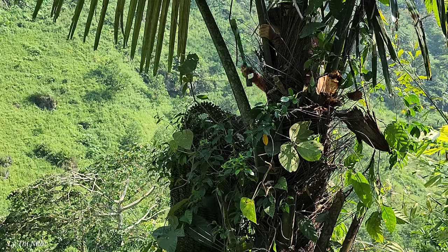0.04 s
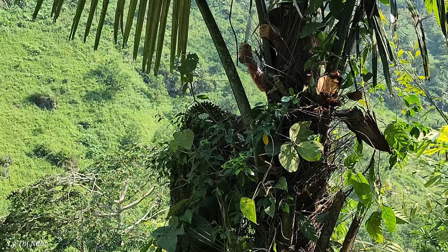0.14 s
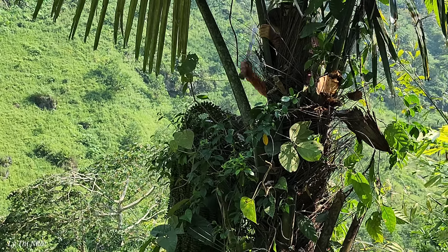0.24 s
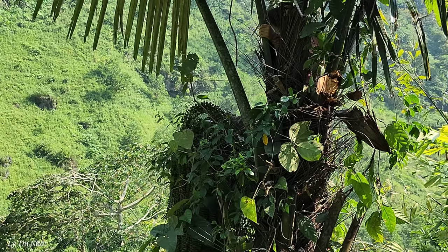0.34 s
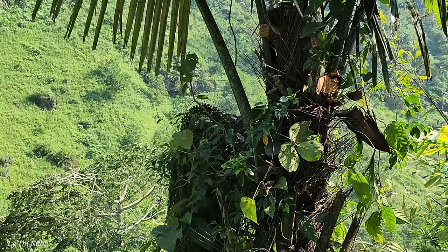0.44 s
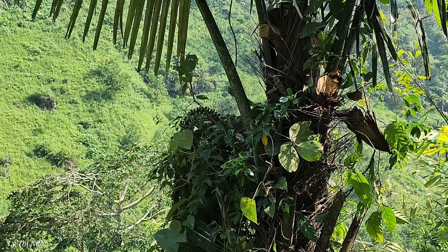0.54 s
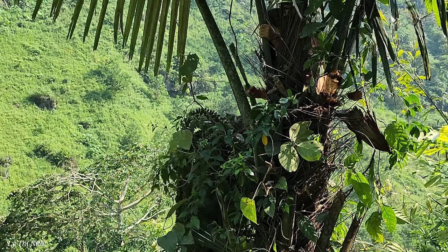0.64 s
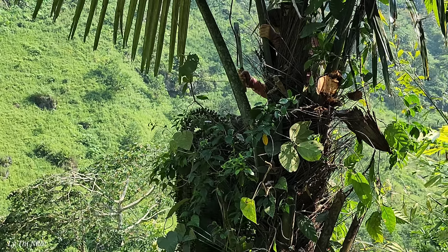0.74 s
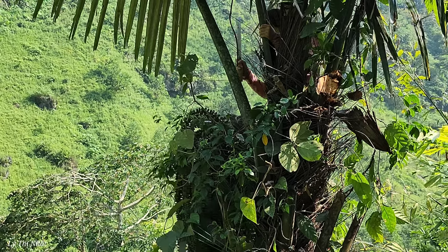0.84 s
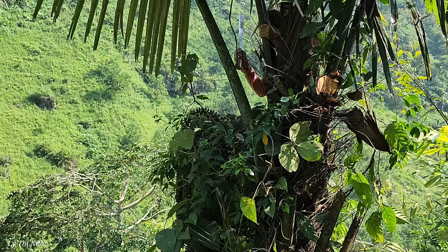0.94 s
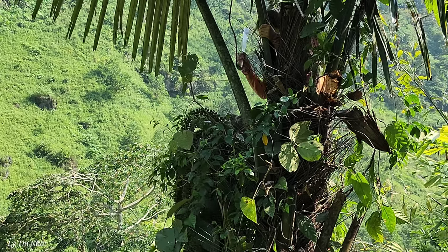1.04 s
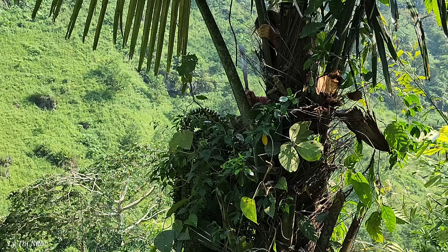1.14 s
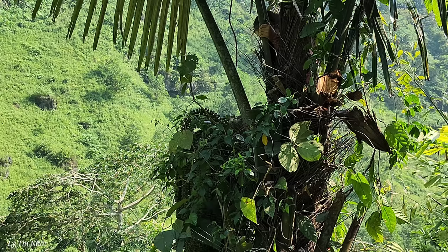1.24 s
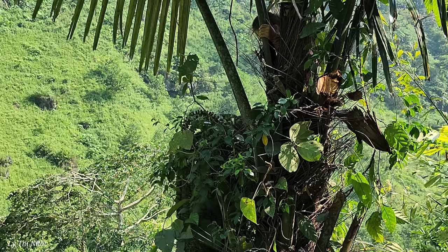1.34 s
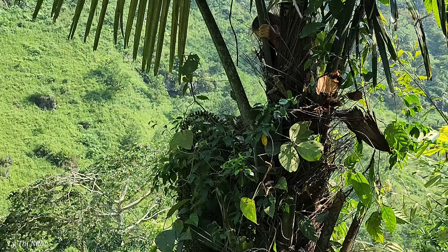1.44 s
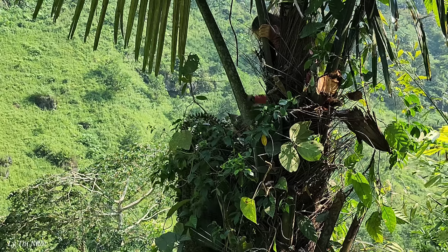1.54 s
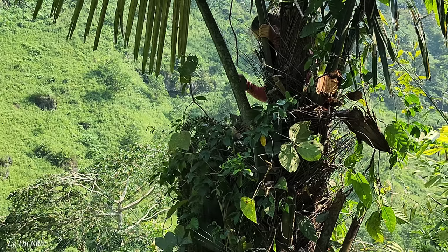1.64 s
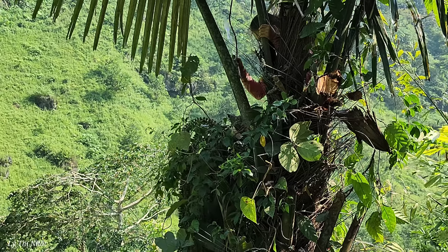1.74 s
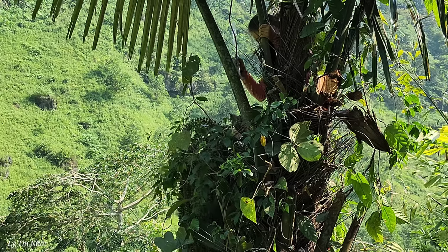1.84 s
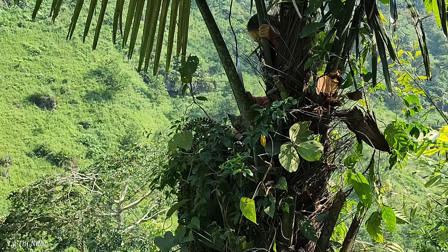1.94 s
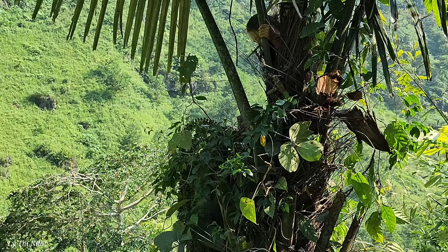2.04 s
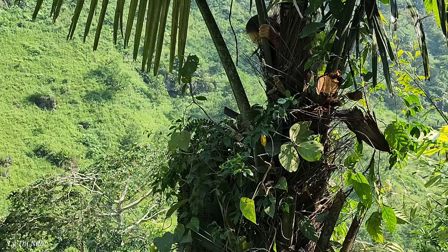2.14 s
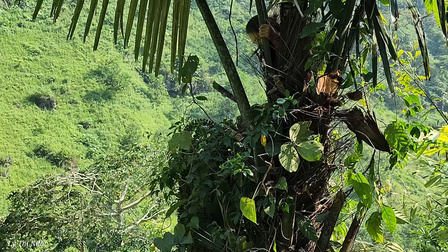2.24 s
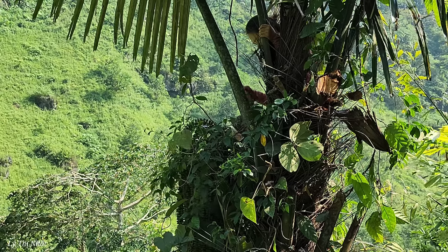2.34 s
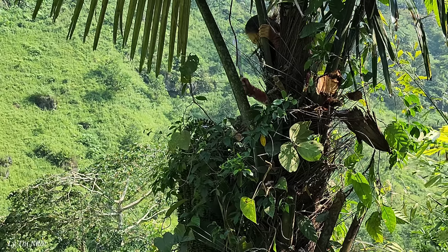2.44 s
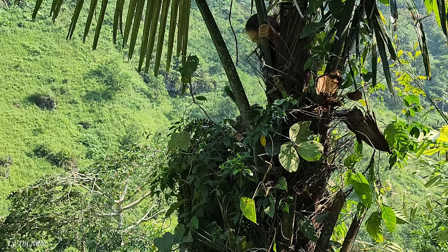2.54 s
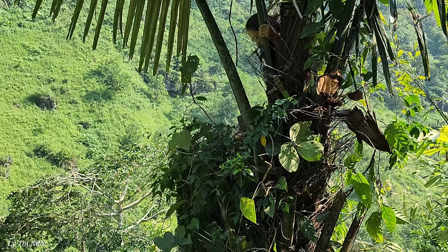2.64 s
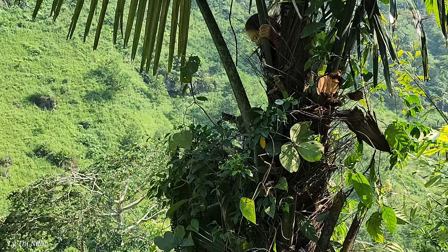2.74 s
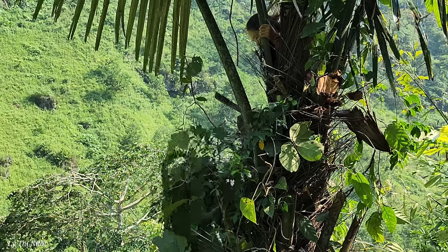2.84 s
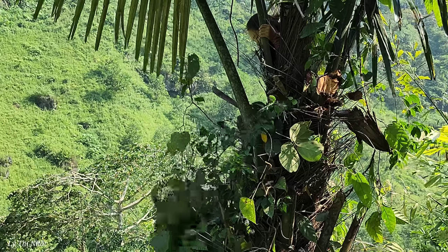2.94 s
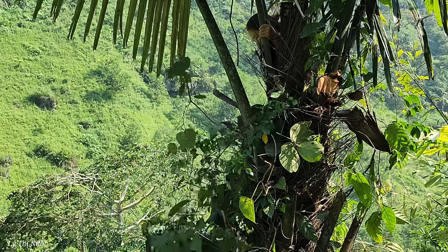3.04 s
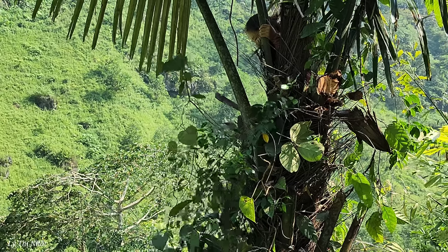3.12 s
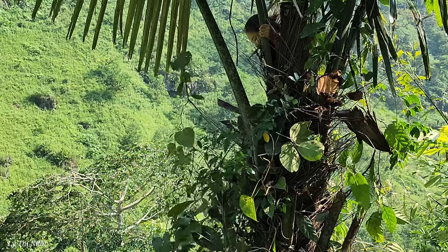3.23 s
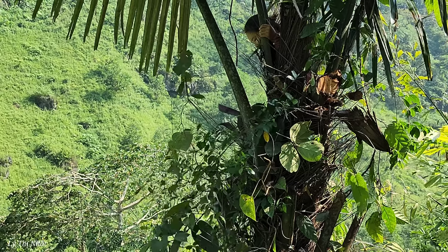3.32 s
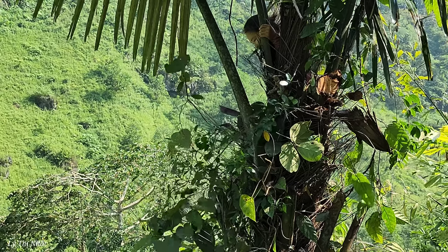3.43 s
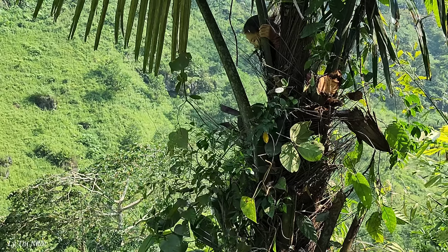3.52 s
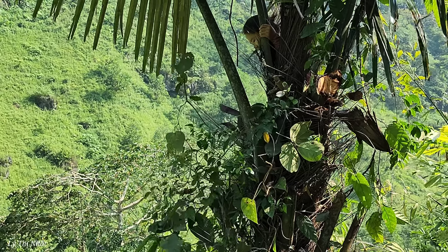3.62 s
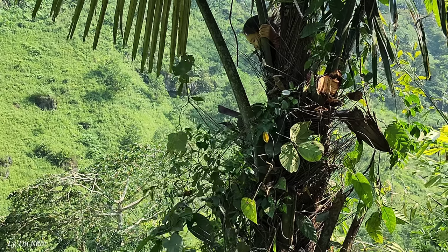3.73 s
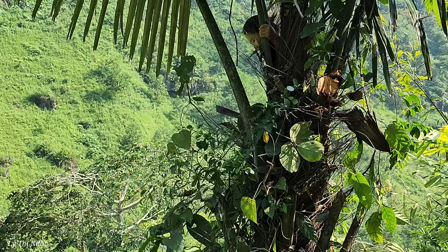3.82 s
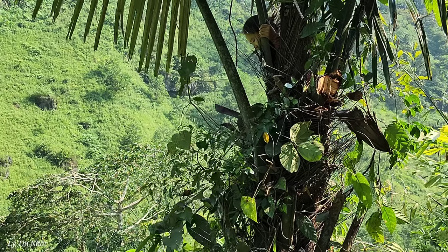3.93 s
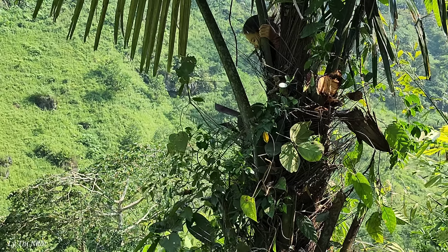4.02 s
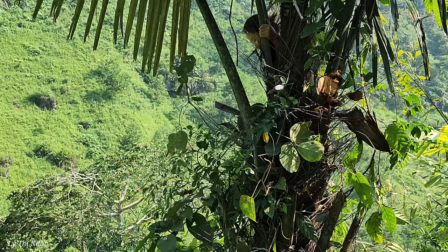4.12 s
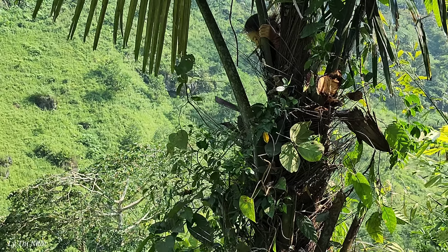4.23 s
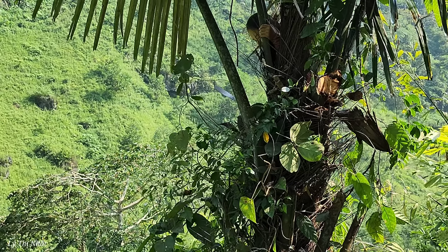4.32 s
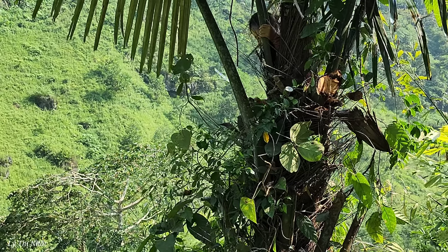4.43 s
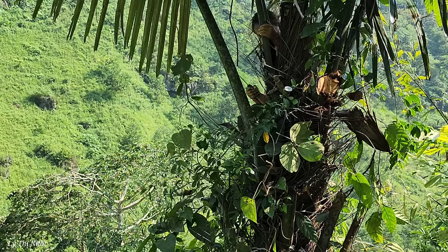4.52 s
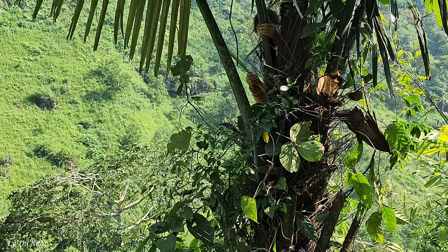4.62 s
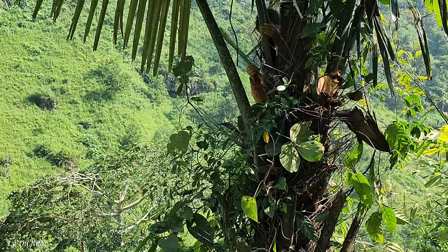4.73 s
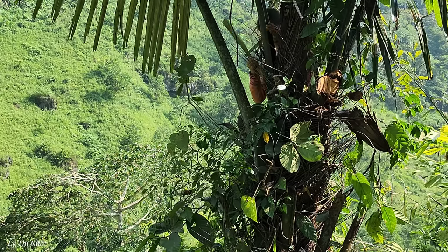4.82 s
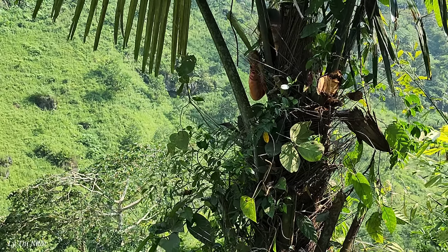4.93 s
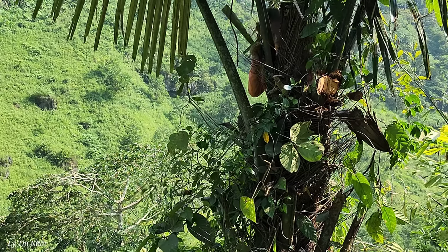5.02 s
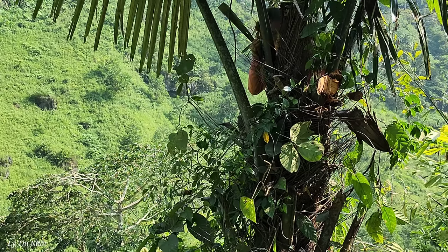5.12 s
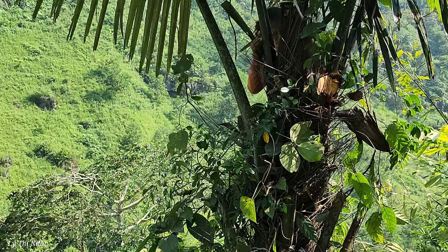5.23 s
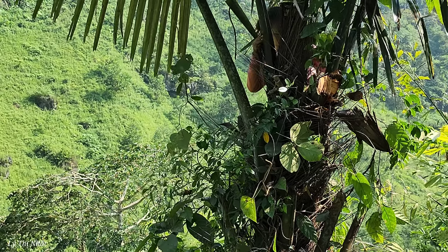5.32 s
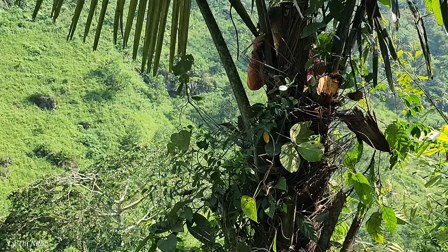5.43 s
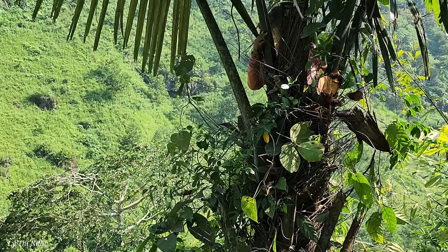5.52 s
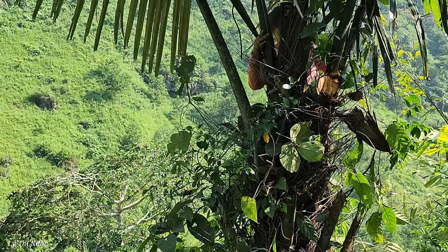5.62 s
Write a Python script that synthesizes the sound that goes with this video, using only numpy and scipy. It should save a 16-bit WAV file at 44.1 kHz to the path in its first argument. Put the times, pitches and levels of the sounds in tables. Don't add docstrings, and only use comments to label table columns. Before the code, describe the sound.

Four blade chops crack a fibrous palm stalk, then the cut bunch crashes through leaves and knocks to the ground amid cicadas and birdsong.

```python
import sys
import numpy as np
from scipy import signal
from scipy.fft import rfft, irfft, next_fast_len
from scipy.io import wavfile

SR = 44100
rng = np.random.default_rng(int(sys.argv[2]) if len(sys.argv) > 2 else 0)


def volts_from_decibels(level):
    exponent = np.asarray(level, float) / 20
    return 10 ** exponent


def transcribe(signal):
    frames = np.atleast_2d(signal).T
    limited = np.clip(frames, -1, 1)
    pcm = np.round(limited * 32767).astype(np.int16)
    wavfile.write(sys.argv[1], SR, pcm)


N = 250047

# frequency [Hz], density [dB per Hz].
AIR_SPECTRUM = [(15, -43), (25, -15), (102, -16), (189, -24.5), (307, -18.5), (500, -26.5), (1470, -22.5),
                (2890, -19), (3130, -12), (5520, -13), (6490, -34.5), (7830, 9.5), (11400, -30.5),
                (14600, -11.5), (15800, -7)]
# time [s], level [dB].
LOW_HUSH_DB = [(0, -48.5), (.17, -62), (.94, -54), (1.28, -60.5), (2.08, -55.5), (2.5, -62), (4.9, -58),
               (5.3, -54.5), (5.67, -56.5)]
SWARM_DB, SWARM_SCARED_DB = -59.5, -62

# pulses per second [1/s], pulse depth [0-1], pitch wander [Hz], level [dB].
CICADA_PULSES = [
    (141.5, 0.1, 14, -1),
    (130, 0.6, 15, -8.5),
    (122, 0.24, 13.6, -6),
]
CICADA_PITCH_HZ = (7669, 8041, 8294)
# time [s], level [dB].
CHORUS_DB = [(0.0, -52.5), (0.41, -54.5), (0.69, -53), (1.83, -51.5), (2.41, -56), (2.62, -54)]
# time [s], level [dB].
FAR_CICADA_DB = [(0, -61.5), (4.5, -59), (5.67, -58.5)]
FAR_TONES_HZ = (7520, 7990)
FAR_PULSES_PER_S = 113
KATYDID_S, KATYDID_PER_S, KATYDID_SLOWS = .2094, 23.38, .19

# start [s], length [s], level [dB].
CRICKET_TRILLS = [(0, 0.018, -68.5), (0.096, .07, -81), (0.742, 0.07, -69), (0.882, 0.086, -73.5),
                  (1.01, 0.088, -77), (1.155, 0.11, -76), (1.432, 0.1, -71), (1.577, 0.082, -68.5),
                  (2.363, 0.12, -72.5), (2.53, 0.06, -73)]
CRICKET_HZ, CRICKET_CLICKS_PER_S = 5480, 250

# length [s], start [Hz], middle [Hz], end [Hz]. CALL is the repeated one.
CALL = (.053, 2930, 3450, 2950)
ARCH = (.09, 3700, 4430, 3650)
HELD = (.28, 4300, 4310, 4300)
LOW = (.06, 1700, 1750, 1700)
RISE = (.04, 3500, 4300, 4900)
DROP = (.075, 5800, 4300, 3300)
PIP = (.015, 4500, 4100, 3700)
CALL_FIRST_S, CALL_EVERY_S, CALL_LAST_S, CALL_DB = -.008, .3237, 5.6, -62
# start [s], note (as above), level [dB].
SONG = [
    (.16, ARCH, -75),
    (.82, PIP, -74),
    (.886, ARCH, -65),
    (2.4, RISE, -70),
    (2.485, DROP, -71),
    (4.74, HELD, -74),
    (5.385, LOW, -70),
]
NOTE_SWELL = .6

# frequency [Hz], side minus mid [dB].
SIDE_MINUS_MID = [(60, -19), (150, -22), (380, -11), (950, -5.5), (2380, -5.5), (5980, 0.5), (15000, -1.5)]
# frequency [Hz], left minus right [dB].
LEFT_MINUS_RIGHT = [(60, 3.5), (110, -2), (200, 0), (380, 1.5), (700, -3), (1290, 1), (2380, -1),
                    (4400, -1.0), (8120, -3.5), (15000, -1.5)]

# frequency [Hz], density [dB per Hz].
RUSTLE_SPECTRUM = [(18, -32), (30, -21.5), (95, -2.5), (174, -8), (382, -5), (483, -9.5), (1210, -5.5),
                   (1450, 2), (1840, -20), (2040, -3), (2660, -4.5), (5540, -10), (8870, -14.5),
                   (14600, -14), (15800, -11)]
LAYER_CENTRES_HZ = (130, 520, 1900, 8000)
# time [s], lag of the right port [samples].
RIGHT_LAG_SAMPLES = [(0, -0.5), (3, 2), (3.7, 1), (4.6, 8), (5.0, 4.5), (5.67, 0)]
DRY_FROND_HZ, DRY_FROND_T60_S, DRY_FROND_DB = 5500, 0.035, -20.5
# start [s], rustle level [dB], solidity of the trunk [dB].
CROWN_JOLTS = [
    (.44, -40, 7),
    (1.331, -43.5, 5),
    (2.132, -37, -9),
    (2.67, -30, -24),
]
LAYER_JOLT_T60_S = (0.3, 0.16, 0.21, 0.13)
JOLT_STEMS_DB, JOLT_HISS_DB = 0.5, 7.5
# start [s], length [s], rustle level [dB].
DEBRIS_SHOWERS = [
    (0.435, 0.016, -39),
    (0.534, 0.2, -47.5),
    (.8, 0.067, -62),
    (1.397, 0.4, -51.5),
    (1.91, 0.026, -59),
    (2.138, .11, -52.5),
    (4.14, 0.021, -54),
    (4.267, 0.019, -42),
]
SHOWER_RISE_S, SHOWER_T60_S = 0.08, 0.19
SHOWER_LAYERS_DB = (-15, -5, -0.5, 3.5)
# time [s], rustle level [dB].
CROWN_FALL = [(2.69, -40), (2.77, -42.5), (2.916, -41.5), (3.012, -35), (3.25, -33.5), (3.298, -29.5),
              (3.465, -30), (3.48, -34), (3.68, -33)]
# time [s], rustle level [dB].
GROUND_FALL = [(3.718, -36.5), (3.76, -28.5), (3.931, -26.5), (4.03, -38), (4.585, -41), (4.63, -49),
               (4.78, -53), (5.1, -60), (5.45, -63.5)]
# still near, far below, a point past the end to drift towards [s].
FALL_MOMENTS_S = (3.11, 4.02, 7.9)
FALL_LAYERS_DB = [(-12.5, -8.5, -13), (-2, -12, -15), (-2.5, -3, 5), (5, -1.5, 5)]

# frequency [Hz], level [dB], t60 [s].
BUNCH_MODES = [(1010, -6, .018), (1430, -3, .013), (1700, -6, .012), (2060, 0, .015), (3160, -6, .009),
               (5580, -7, .01), (6240, -8, .01)]
BUNCH_HITS_PER_S, BUNCH_UNEVEN_DB = 700, 2.2
BUNCH_DB, BUNCH_DULLS_DB_PER_OCTAVE = -8, -6

# start [s], peak [dB], centre [Hz], wood knock [dB].
BLOW_SNAPS = [(0.591, -26.5, 2633, -62), (0.6007, -25.5, 3100, -36), (0.6554, -40, 3430, -47),
              (0.6845, -27.5, 5300, -70), (1.4152, -32, 6790, -58), (1.4332, -33.5, 3020, -45),
              (1.479, -26, 1070, -63), (1.5772, -32, 5480, -74), (1.6485, -34, 1970, -39),
              (1.6877, -40, 3150, -59), (1.77, -28.5, 5370, -73), (1.8318, -31, 1630, -38.5),
              (2.174, -35.5, 1970, -44)]
BUNCH_SNAPS = [(2.81, -31, 1550, -31), (2.844, -24.5, 1580, -37), (2.895, -22, 6600, -57),
               (2.9488, -24.5, 2065, -52), (2.9991, -25.5, 1320, -26.5), (3.0475, -17.5, 5400, -29),
               (3.1352, -40, 1460, -46), (3.3, -17, 1920, -54.5), (3.321, -13.5, 2470, -43),
               (3.6015, -22, 1950, -48), (3.6379, -21.5, 2030, -39), (3.666, -20, 1215, -33),
               (3.751, -21, 1450, -54), (3.784, -13.5, 1370, -48), (3.8393, -30, 794, -34),
               (3.924, -14.5, 1564, -39), (3.965, -22, 1490, -54), (4.084, -21, 1585, -44),
               (4.387, -27.5, 1320, -38), (4.4484, -29, 2140, -37), (4.4867, -28.5, 1600, -33.5),
               (4.55, -29, 6200, -80), (5.0051, -33.5, 3500, -61), (5.2973, -42, 4730, -58)]
SNAP_T60_S, SNAP_LONGER = 0.056, 0.1
# start [s], peak [dB], centre [Hz], t60 [s], wood knock [dB].
BRITTLE_TICKS = [(1.457, -22.5, 11900, 0.015, -62), (1.7699, -26, 1910, 0.029, -72),
                 (1.832, -29, 5600, 0.1, -66), (2.845, -23, 6200, 0.054, -62), (1.97, -35, 6840, 0.04, -78),
                 (3.71, -19, 11000, 0.034, -58)]
# start [s], peak [dB], centre [Hz].
LEAF_CHIPS = [(0.057, -43, 1500), (0.555, -44, 1430), (0.685, -32.5, 1670), (0.713, -53, 1410),
              (0.741, -33.5, 1540), (0.819, -48, 1940), (0.856, -42, 1280), (0.943, -42, 2550),
              (0.993, -45.5, 2240), (1.06, -42.5, 1750), (1.144, -42.5, 2820), (1.509, -33.5, 656),
              (2.043, -49, 1710), (2.26, -40, 850), (2.383, -52, 1590), (2.399, -48, 2040),
              (4.727, -37, 1134), (4.901, -47, 1750), (5.24, -42.5, 1310), (5.564, -42.5, 2020)]
LEAF_BRUSH = [
    (0.4074, -34.5, 2150),
]
CHIP_T60_S = .036
CHIP_KNOCK_DB, CHIP_KNOCK_DB_PER_OCTAVE = -19.5, -8.5
# start [s], peak [dB], centre [Hz].
RIB_HITS = [(1.439, -40, 2900), (1.456, -31, 5500), (1.471, -29.5, 2700), (1.642, -30.5, 2080),
            (1.706, -36, 3150), (1.752, -46, 3500), (1.826, -34, 2090), (1.932, -39.5, 3970),
            (.58, -44, 2770), (.608, -44, 1670), (.668, -35, 3160), (2.776, -34, 1400), (2.989, -24, 1340),
            (3.036, -28, 5540), (3.062, -21, 5660), (3.084, -24, 3120), (3.123, -21, 5630),
            (3.141, -26, 1870), (3.192, -20, 2910), (3.22, -20, 2040), (3.267, -24, 1530),
            (3.284, -14, 2000), (3.37, -45, 5500), (3.377, -20, 1520), (3.41, -17, 2000),
            (3.424, -18.5, 3400), (3.445, -30, 2080), (3.742, -17, 1350), (3.827, -24, 2270),
            (4.025, -26.5, 1330), (4.129, -34, 1440), (4.175, -31, 1590), (4.207, -40, 1490),
            (4.268, -27.5, 920), (4.289, -30, 1580), (4.398, -29, 2170), (4.585, -36, 1500)]
RIB_T60_S = 0.039

# frequency [Hz], level [dB], t60 [s].
STALK_MODES = [(203.8, -1.5, 0.042), (325.7, 0.5, 0.057), (389.6, -3, 0.051), (593, 3.5, 0.028),
               (906, -7.5, 0.058), (1200, -17, 0.077), (1499, -7, 0.031)]
# start [s], peak [dB], centre [Hz], t60 [s], wood knock [dB].
BLOW_CRACKS = [(.4290, -20, 5700, 0.028, -50.5), (.4325, -11, 1505, 0.037, -25.5),
               (.4345, -11.5, 4910, 0.037, -26), (.4365, -13.5, 1400, 0.04, -20.5),
               (.4405, -31.5, 1200, 0.15, -37), (1.3075, -29, 1780, 0.02, -59),
               (1.3122, -19, 3430, 0.077, -57.5), (1.3158, -19, 4900, 0.026, -42.5),
               (1.3170, -13, 1360, 0.035, -25), (1.3200, -37, 1200, 0.018, -25),
               (2.1057, -16, 880, 0.031, -36), (2.11, -16.5, 1290, 0.044, -49),
               (2.1167, -28, 1390, 0.024, -51), (2.1208, -11, 1820, 0.021, -53),
               (2.131, -15, 5880, 0.023, -48), (2.652, -25.5, 2210, 0.11, -53),
               (2.663, -25, 2340, 0.02, -64), (2.6687, -15, 3560, 0.07, -55),
               (2.6720, -17, 1940, 0.082, -37), (2.675, -16.5, 4600, 0.062, -34),
               (2.6954, -12.5, 5000, 0.041, -38), (2.7039, -19, 5030, 0.17, -41),
               (2.7433, -23.5, 11900, 0.018, -36)]
# start
# [s], peak [dB], frequency [Hz], t60 [s].
BODY_THUMPS = [(0.44, -21.5, 77.6, 0.22), (1.319, -24.5, 75.5, 0.16), (1.321, -37.5, 126, 0.16),
               (2.13, -44, 78.5, 0.26), (2.681, -34.5, 80.5, 0.16), (3.789, -36, 94, 0.13),
               (3.929, -24, 103, 0.11), (4.485, -28, 304, 0.027), (0.4394, -18.5, 395, 0.033),
               (0.434, -27, 1180, .03), (1.318, -18, 513, 0.03), (2.109, -24.5, 444, 0.043),
               (2.815, -26, 630, 0.033), (2.994, -26.5, 329, 0.084)]
BLOW_PINGS = [(1.3111, -24, 1230, .025), (1.3122, -22, 2750, 0.018), (1.3125, -24, 700, 0.03),
              (1.312, -28, 1400, 0.082), (1.315, -30, 1000, 0.028), (0.45, -23.5, 1400, 0.036),
              (.436, -34, 857, 0.052), (0.43, -31, 1830, .05), (2.107, -36, 1500, 0.024),
              (2.1075, -26, 600, 0.031), (2.666, -24, 1500, 0.033), (2.1215, -40, 2200, 0.026),
              (2.664, -24.5, 1870, 0.067), (2.673, -33, 2900, 0.048), (2.695, -21, 6100, .03)]


def rms_one(x):
    return x / np.sqrt(np.mean(x ** 2) + 1e-20)


def in_time(rows):
    s, *columns = np.transpose(rows)
    return [np.interp(np.arange(N) / SR, s, c) for c in columns]


def at_hz(points, hz):
    points_hz, points_db = np.transpose(points)
    return np.interp(np.log(hz + 1), np.log(points_hz), points_db)


def drift(rate):
    r = np.exp(-80 * np.pi * rate / SR)
    slow = signal.lfilter([1], [1, -2 * r, r * r], rng.standard_normal(N // 40 + 2002))[2000:]
    return np.interp(np.arange(N) / 40, np.arange(len(slow)), rms_one(slow))


def ring(clicks, hz, t60_s):
    r, w = volts_from_decibels(-60 / (t60_s * SR)), 2 * np.pi * hz / SR
    return signal.lfilter([0, np.sin(w)], [1, -2 * r * np.cos(w), r * r], clicks + 1e-18)


def band_pass(x, low_hz, high_hz):
    return signal.sosfilt(signal.butter(2, [low_hz, high_hz], "band", fs=SR, output="sos"), x)


def add(out, s, sound):
    i = round(s * SR)
    out[..., i:i + sound.shape[-1]] += sound[..., :N - i]


def bands(drive, spectrum, shift_db, patchy_db, flicker, grains, together):
    out, power = 0, 0
    edges = 24 * 2 ** (np.arange(22) / 2.25)
    shared = drift(flicker)
    for k, (low, high) in enumerate(zip(edges, np.append(edges[1:], 17000))):
        hz = np.sqrt(low * high)
        part = band_pass(drive[k % 2] + np.roll(grains, 9001 * k, axis=-1), low, high)
        level_db = at_hz(spectrum, hz)
        power += np.mean(part[0] ** 2) * volts_from_decibels(2 * level_db)
        flicker_db = patchy_db * (together * shared + drift(flicker))
        out = out + part * volts_from_decibels(level_db + shift_db(hz) + flicker_db)
    return out / np.sqrt(power)


def ports(mid, side):
    size = next_fast_len(N + 4096)
    hz = np.arange(size // 2 + 1) * SR / size
    mid, side = rfft(mid, size), rfft(side, size) * volts_from_decibels(at_hz(SIDE_MINUS_MID, hz))
    tilt = volts_from_decibels(at_hz(LEFT_MINUS_RIGHT, hz) / 2)
    return irfft([(mid + side) * tilt, (mid - side) / tilt], size)[:, :N]


def hillside():
    low_db, = in_time(LOW_HUSH_DB)
    top_db = np.interp(np.arange(N) / SR, FALL_MOMENTS_S[:2], [SWARM_DB, SWARM_SCARED_DB])

    def shift_db(hz):
        return low_db + 61.0 if hz < 3000 else top_db + 55.5 if hz > 9500 else 0

    hush = bands(rng.standard_normal((2, 2, N)), AIR_SPECTRUM, shift_db,
                 patchy_db=2.1, flicker=8.5, grains=np.zeros(N), together=0.063)
    return ports(*volts_from_decibels([[-52], [-51]]) * hush)


def katydid():
    hiss = band_pass(rng.standard_normal((2, N)), 13300, 15800)
    t = np.arange(N) / SR - KATYDID_S
    turn = 2 * np.pi * t * (KATYDID_PER_S - KATYDID_SLOWS * t)
    chirps = volts_from_decibels(4.5 * np.cos(turn) - 3.0 * np.cos(4 * turn))
    return volts_from_decibels(5.0 + 2.1 * drift(9)) * chirps * hiss * volts_from_decibels([[-1.2], [1.2]])


def far_cicada():
    t = np.arange(N) / SR
    beat = 1 + .7 * np.cos(2 * np.pi * FAR_PULSES_PER_S * t + 1.5 * drift(8))
    tones = 0
    for gain, hz in zip((1, .45), FAR_TONES_HZ):
        tone = np.sin(2 * np.pi * np.cumsum(hz + 32 * drift(40)) / SR)
        tones = tones + gain * volts_from_decibels(2.5 * drift(20)) * tone
    level_db, = in_time(FAR_CICADA_DB)
    return volts_from_decibels(level_db) * rms_one(beat * tones) * volts_from_decibels([[-2.0], [2.0]])


def cicadas():
    out = np.zeros(N)
    near_db, = in_time([*CHORUS_DB, (4.2, -62), (4.6, -80)])
    for hz, (per_s, depth, wander_hz, db) in zip(CICADA_PITCH_HZ, CICADA_PULSES):
        pulse_hz = per_s * (1 + 0.0069 * drift(2.5))
        beat = np.cos(2 * np.pi * np.cumsum(pulse_hz) / SR + 2 * np.pi * rng.random())
        tone = np.sin(2 * np.pi * np.cumsum(hz + wander_hz * drift(34)) / SR)
        rasp = rms_one(ring(rng.standard_normal(N), hz, 0.0071))
        out += (tone + 0.55 * rasp) * (1 + depth * beat) * volts_from_decibels(db + 2.0 * drift(14))
    near = volts_from_decibels(near_db) * (out + katydid()) * volts_from_decibels([[-2.5], [2.5]])
    return near + far_cicada()


def cricket():
    clicks = np.zeros(N)
    for s, length_s, db in CRICKET_TRILLS:
        at = np.arange(0, length_s, 1 / CRICKET_CLICKS_PER_S)
        swell = np.sqrt(np.sin(np.pi * (at + 0.0067) / (length_s + 0.015)))
        at = np.abs(at + rng.normal(0, 0.00051, len(at)))
        clicks[((s + at) * SR).astype(int)] = swell * volts_from_decibels(db + 35.5 + rng.normal(0, 2.6, len(at)))
    return ring(ring(clicks, CRICKET_HZ, .010), CRICKET_HZ, .003) * .04


def birds():
    out = np.zeros(N)
    call_times_s = [*(CALL_FIRST_S + CALL_EVERY_S * np.arange(9)), CALL_LAST_S]
    calls = [(max(s, .01), CALL, CALL_DB - 3.5 * (s < .1)) for s in call_times_s]
    for s, (length_s, start_hz, middle_hz, end_hz), db in calls + SONG:
        u = np.linspace(-1, 1, round(length_s * SR))
        bend_hz = (start_hz + end_hz) / 2 - middle_hz
        hz = middle_hz + (end_hz - start_hz) / 2 * u + bend_hz * u ** 2
        note = volts_from_decibels(db + 13.0) * (1 - u ** 2) ** NOTE_SWELL * np.sin(2 * np.pi * np.cumsum(hz) / SR)
        add(out, s, note)
        add(out, s + .017, volts_from_decibels(-18) * note)
        add(out, s + .043, volts_from_decibels(-24) * note)
    return out * volts_from_decibels(5.5 * drift(120) - 2.5)


def fall_vigour(end_s):
    before, after = (CROWN_FALL[0][0] - .02, -90), (GROUND_FALL[-1][0] + end_s, -90)
    return [before, *CROWN_FALL, *GROUND_FALL, after]


def shaking():
    t = np.arange(0, N, 16) / SR
    power = np.full((4, len(t)), 1e-9)
    jolt_t60_s = np.array(LAYER_JOLT_T60_S)[:, None]
    for s, db, solid_db in CROWN_JOLTS:
        start_db = db + np.array([[solid_db], [JOLT_STEMS_DB], [0], [JOLT_HISS_DB]])
        power += (t > s - .008) * volts_from_decibels(2 * (start_db - 60 * np.maximum(t - s, 0) / jolt_t60_s))
    for s, length_s, db in DEBRIS_SHOWERS:
        rise = np.clip((t - s) / SHOWER_RISE_S + .5, 0, 1)
        shape = rise * volts_from_decibels(-60 * np.maximum(t - s - length_s, 0) / SHOWER_T60_S)
        power += (shape * volts_from_decibels(db + np.array(SHOWER_LAYERS_DB)[:, None])) ** 2
    colour_db = np.array([np.interp(t, FALL_MOMENTS_S, layer_db) for layer_db in FALL_LAYERS_DB])
    fall_db = np.interp(t, *np.transpose(fall_vigour(0.07)))
    power += volts_from_decibels(2 * (fall_db + colour_db))
    return np.repeat(10 * np.log10(power), 16, axis=1)[:, :N]


def leaves():
    moves_db = shaking() + [[12], [6], [0], [0.5]]

    def shift_db(hz):
        place = np.interp(np.log(hz), np.log(LAYER_CENTRES_HZ), [0, 1, 2, 3])
        return np.maximum(1 - np.abs(place - np.arange(4)), 0) @ moves_db

    sizes = volts_from_decibels(0.92 * np.minimum(rng.exponential(1, N), 5)) * rng.standard_normal((2, N))
    ticks = rms_one(sizes * (rng.random(N) < 1500 * volts_from_decibels(3.0 * drift(30)) / SR))
    drive = 0.8 * ticks + rng.standard_normal((2, 2, N))
    flicks = .6 * rms_one(sizes * (rng.random(N) < 300 / SR))
    rustle = ports(*volts_from_decibels(3.0) * bands(drive, RUSTLE_SPECTRUM, shift_db,
                                     patchy_db=1.0, flicker=20, grains=flicks, together=0.33))
    slaps = np.roll(flicks, 777, axis=-1) * volts_from_decibels(4.0 * drift(3.1))
    frond = rms_one(ring(slaps, DRY_FROND_HZ, DRY_FROND_T60_S))
    rustle += volts_from_decibels(moves_db[3] + DRY_FROND_DB) * frond
    n = np.arange(N)
    rustle[1] = np.interp(n - in_time(RIGHT_LAG_SAMPLES)[0], n, rustle[1])
    return rustle


def bunch():
    vigour_db, = in_time(fall_vigour(0.1))
    far, = in_time([(FALL_MOMENTS_S[0], 0), (FALL_MOMENTS_S[1], 1)])
    out = np.zeros((2, N))
    for hz, db, t60_s in BUNCH_MODES:
        uneven_db = BUNCH_UNEVEN_DB * np.minimum(rng.exponential(1, N), 4)
        hits = (rng.random(N) < BUNCH_HITS_PER_S / SR) * volts_from_decibels(uneven_db + 2.5 * drift(12))
        dull_db = far * BUNCH_DULLS_DB_PER_OCTAVE * max(np.log2(hz / 1500), 0)
        knocks = ring(hits * rng.standard_normal((2, N)), hz, min(t60_s, .03))
        out += volts_from_decibels(db + dull_db) * rms_one(knocks)
    return volts_from_decibels(vigour_db + BUNCH_DB) * out


def cracks(events, broad, width, rise_s, knock_db, small, ping_db):
    out, t = np.zeros((2, N)), np.arange(3300) / SR
    no_bass = signal.butter(2, 170, "high", fs=SR, output="sos")
    dull = signal.butter(1, 9000, fs=SR, output="sos")
    for s, peak_db, hz, t60_s, wood_db in events:
        white = rng.standard_normal((3, 3300))
        decay_db = -60 * t / max(t60_s, .004)
        burst = white[:2] * np.abs(white[2]) * volts_from_decibels(decay_db) * np.minimum(t / rise_s, 1)
        burst *= 1 + 1.8 * np.exp(-t / 0.00028)
        low_hz, high_hz = np.clip([hz / width, hz * width], 100, 17000)
        burst = band_pass(burst, low_hz, high_hz) + broad * signal.sosfilt(dull, burst)
        knock = 0
        for mode_hz, mode_db, mode_t60_s in STALK_MODES:
            level_db = mode_db + rng.normal(0, 4.4) - 60 * t / mode_t60_s
            knock = knock + volts_from_decibels(level_db) * np.sin(2 * np.pi * small * mode_hz * t)
        ping = volts_from_decibels(ping_db + decay_db) * np.sin(2 * np.pi * hz * t) * [[1], [.7]]
        both = volts_from_decibels(peak_db) * (burst / np.max(np.abs(burst[0])) + ping)
        both -= volts_from_decibels(wood_db + knock_db) * knock * [[1], [.7]]
        add(out, s, signal.sosfilt(no_bass, both))
    return out


def debris():
    snaps = [(s, db, hz, SNAP_T60_S * volts_from_decibels(SNAP_LONGER * (db + 25)), wood_db)
             for s, db, hz, wood_db in BLOW_SNAPS + BUNCH_SNAPS]
    chips = [(s, db, hz, CHIP_T60_S, db + CHIP_KNOCK_DB + CHIP_KNOCK_DB_PER_OCTAVE * np.log2(hz / 1000))
             for s, db, hz in LEAF_CHIPS + LEAF_BRUSH]
    ribs = [(s, db, hz, RIB_T60_S, db - 24) for s, db, hz in RIB_HITS]
    out = cracks(snaps + BRITTLE_TICKS, broad=0.35, width=1.424, rise_s=0.00029,
                 knock_db=-8.5, small=1.4, ping_db=-13.5)
    out += cracks(chips, broad=0.15, width=1.28, rise_s=0.00033, knock_db=-5.0, small=5.1, ping_db=-5)
    ribs = cracks(ribs, broad=0.45, width=1.44, rise_s=0.00052, knock_db=-19.0, small=1.46, ping_db=-11)
    return out * [[1], [0.79]] + ribs


def thumps():
    out, t = np.zeros(N), np.arange(SR // 2) / SR
    for s, db, hz, t60_s in BODY_THUMPS + BLOW_PINGS:
        swell = 1 - np.exp(-t * hz / 0.6)
        add(out, s, volts_from_decibels(db - 60 * t / t60_s) * swell * np.cos(2 * np.pi * hz * t))
    return out


def blows():
    out = cracks(BLOW_CRACKS, broad=0.56, width=1.68, rise_s=0.0012,
                 knock_db=-0.5, small=0.96, ping_db=-19.5) * [[1], [0.79]]
    out[0] += thumps()
    return out


def scene():
    around = hillside() + cicadas() + leaves()
    singers = cricket() + birds()
    far = np.array([singers, .6 * np.roll(singers, 37)])
    near = bunch() + debris() + blows()
    return ports(*(far + near)) + around


def band_limit(x):
    return signal.sosfilt(signal.butter(12, 16490, fs=SR, output="sos"), x)


def record(dry):
    no_bass = signal.butter(2, 35, "high", fs=SR, output="sos")
    no_top = signal.ellip(12, .5, 60, 15530, fs=SR, output="sos")
    return band_limit(signal.sosfilt(no_top, signal.sosfilt(no_bass, dry)))


dry = scene()
out = record(dry)
transcribe(out)
```